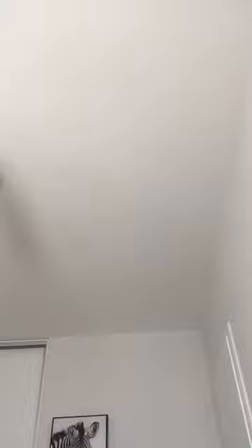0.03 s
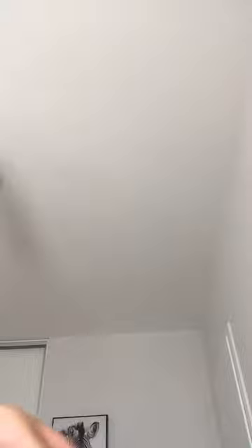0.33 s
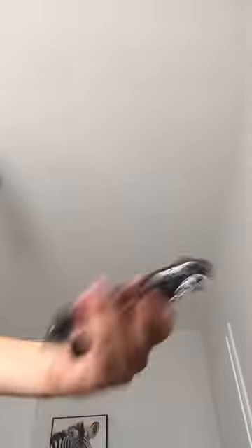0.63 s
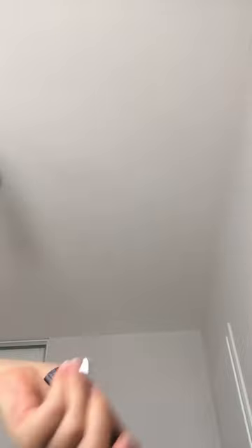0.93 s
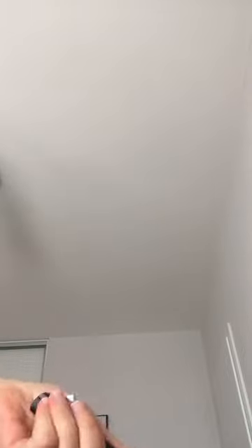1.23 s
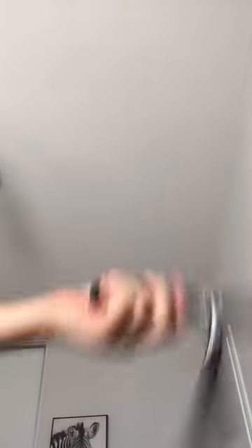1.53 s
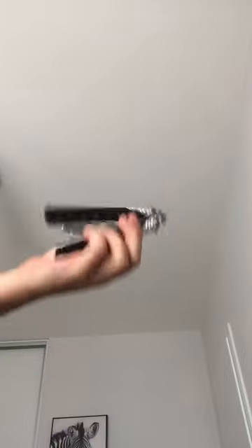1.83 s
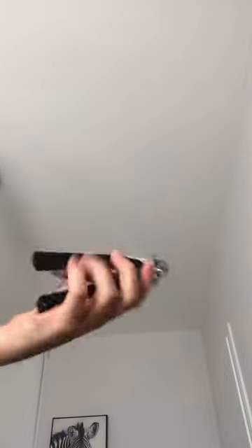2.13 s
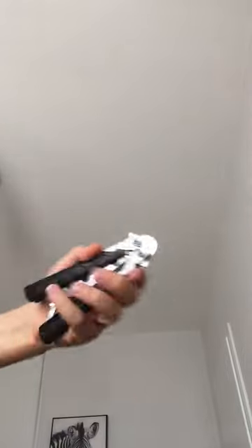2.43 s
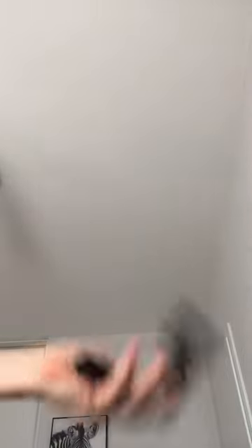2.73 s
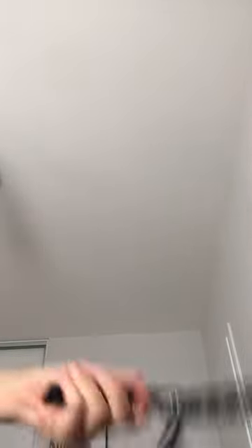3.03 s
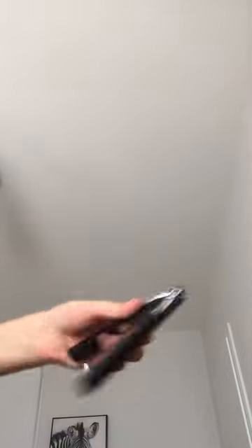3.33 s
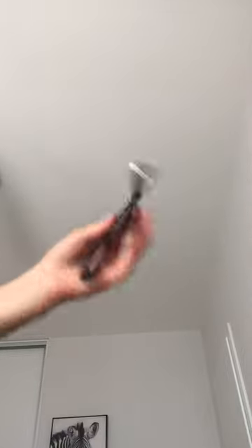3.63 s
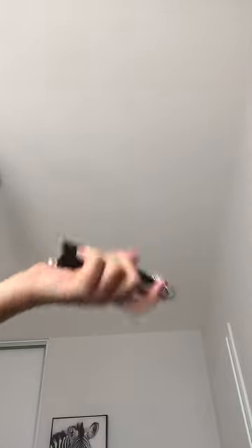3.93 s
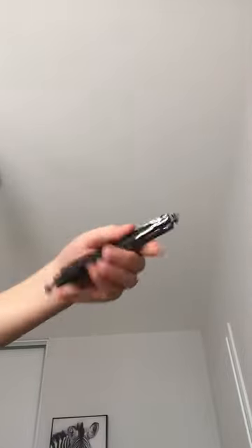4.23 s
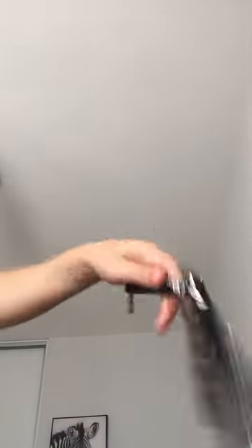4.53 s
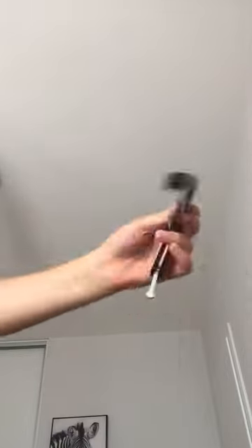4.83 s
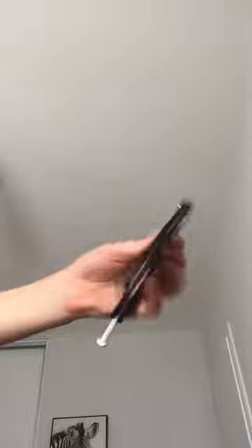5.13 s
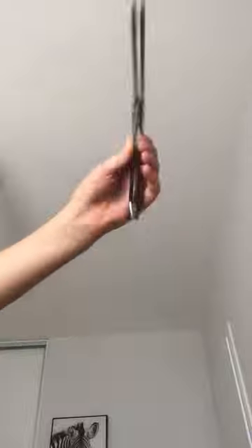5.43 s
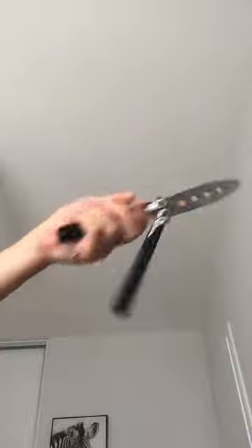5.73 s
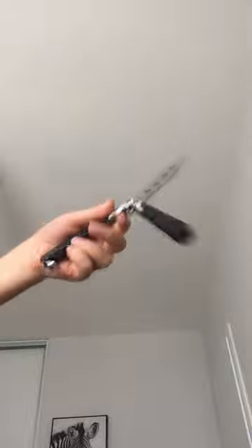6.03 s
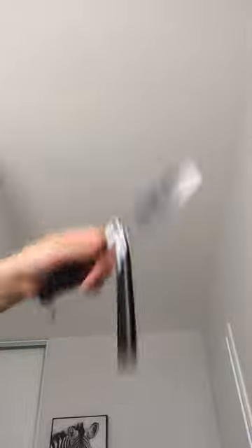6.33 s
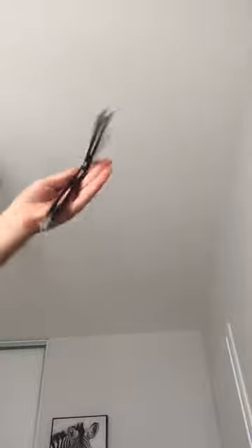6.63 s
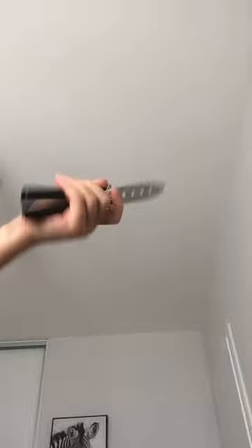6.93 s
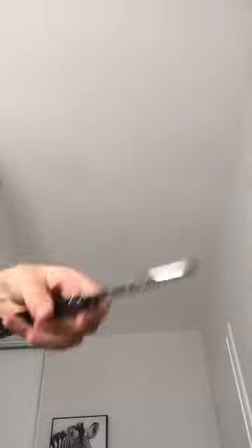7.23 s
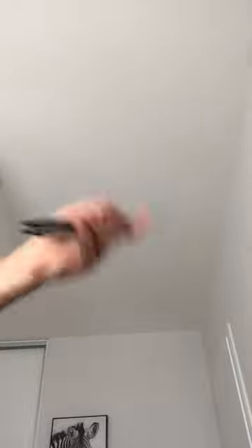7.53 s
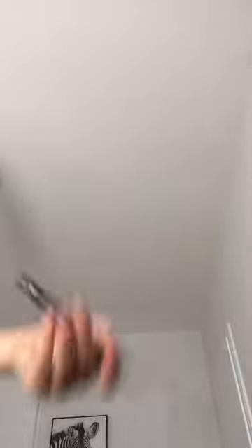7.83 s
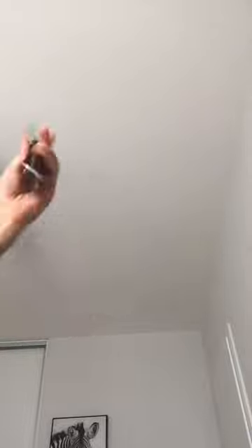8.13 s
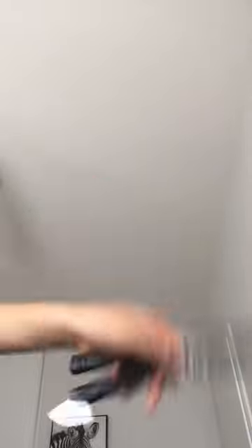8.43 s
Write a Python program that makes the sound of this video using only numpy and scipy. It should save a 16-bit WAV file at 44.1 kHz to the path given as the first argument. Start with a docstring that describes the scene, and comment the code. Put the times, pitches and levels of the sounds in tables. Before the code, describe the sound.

A butterfly knife is flipped by hand close to the microphone, in a small room with a faint steady hum. Light ticks begin at about 0.5 seconds and lead straight into a quick run of bright metal clacks as handles and blade meet. The two loudest hits, each with a brief scrape, land at about 1.2 and 1.9 seconds. Dense, uneven clusters follow from 2.2 to 4.4 seconds, with loose pivots rattling, the latch ticking and a handle sometimes slapping softly into the palm. The clicking then turns lighter, with sharper clacks near 5.7, 6.2, 6.8 and 7.6 seconds. A last flurry runs from about 8.2 to 8.6 seconds. Every hit is short and crisp, with little ringing because the hand damps the steel, and the bare walls add a slight, short echo.

```python
"""A small quiet room, close up: a butterfly knife is flipped by hand.
Handles and blade scrape and clack together in quick runs, and the handles slap into the hand.
The latch ticks and the loose pivots rattle in between. The hand damps the steel, so every
blow is short. Bare walls answer over a faint room hum."""
import sys
import numpy as np
from scipy import signal
from scipy.fft import rfft, irfft, next_fast_len
from scipy.io import wavfile

SR = 44100
rng = np.random.default_rng(int(sys.argv[2]) if len(sys.argv) > 2 else 0)


def wrap_up_sound(samples):
    """Save the sound to the file named by the first command line argument, as 16-bit audio."""
    columns = np.atleast_2d(samples).T
    # keep every value between -1 and 1, then stretch to whole-number steps
    tamed = np.clip(columns, -1, 1)
    steps = np.round(tamed * 32767).astype(np.int16)
    wavfile.write(sys.argv[1], SR, steps)


N = 382788

# Room hum spectrum. Each row: frequency in Hz, relative level in dB.
HUM_SPECTRUM = [(15, -25), (25, -6), (80, -1.5), (229, -12.5), (363, -14), (1100, -18.5), (1840, -18),
                (2050, -23.5), (2760, -20.5), (3080, -21), (16000, -38.5)]
# Room hum envelope. Each row: time in seconds, RMS level in dB.
HUM_ENVELOPE = [(0, -64), (0.499, -67), (8.598, -67.5)]
# Lone latch taps between flips. Each row: start in seconds, level in dB.
LATCH_TAPS = [(0.517, -47.5), (0.6631, -43), (1.1546, -41), (2.1797, -38.5), (3.13, -37), (3.712, -44.5),
              (4.146, -46.5), (5.0834, -46), (5.9581, -38.5), (7.1052, -46.5), (8.0737, -43)]
# Modes of blade and handles. Each row: frequency in Hz, relative level in dB, T60 in seconds.
STEEL_MODES = [(2466, -10.5, 0.079), (2950, -13.5, 0.13), (4270, -11.5, 0.0092), (5855, 2, 0.012),
               (6148, -9.5, 0.015), (6486, -6.5, .04), (8400, -14, .03), (9340, -3.5, 0.003),
               (9840, -20.5, .015), (9900, -18.5, 0.018), (11740, -12, 0.008), (13850, 3, 0.0074),
               (14580, -14, 0.0057)]
# A free handle rattles on its pivot and sings. Each row: start in seconds, end in seconds,
# rattle level in dB, singing level in dB, singing pitch in Hz.
HANDLE_SWINGS = [(0.618, 0.897, -70, -78, 6000), (1.193, 1.395, -78, -72, 8440),
                 (1.793, 2.19, -61.5, -65, 5750), (2.552, 3.348, -63, -60, 9810),
                 (3.707, 4.495, -65, -86, 5930), (5.148, 5.745, -73, -60, 6190),
                 (7.078, 7.804, -75, -74.5, 2610), (8.023, 8.4, -65, -73, 3788),
                 (8.394, 8.673, -69, -66.5, 9990)]
# Handles and blade meet. Each row: start in seconds, level in dB, clack and crack in dB
# relative to that level, clack pitch in Hz.
STEEL_CONTACTS = [(0.687, -29.5, -15, -1.5, 2390), (0.6983, -27.5, -9.5, -6, 4850),
                  (0.7464, -29, -16.5, -16, 2350), (0.7859, -18.5, -22.5, -17, 3020),
                  (0.817, -38, -3.5, -17, 4900), (0.828, -32, -9, -14, 4100),
                  (0.9796, -16.5, -18.5, -14, 3080), (1.0159, -15.5, -17, -15.5, 3970),
                  (1.0242, -22, -10, -22.5, 3100), (1.2101, -6, -19.5, -15, 2960),
                  (1.4039, -16.5, -8, -10.5, 3030), (1.4548, -29.5, -8, -14.5, 4250),
                  (1.6626, -44.5, -22, -13, 4400), (1.7912, -31.5, -20, -17.5, 3050),
                  (1.8733, -7.5, -17.5, -9.5, 2220), (1.895, -16.5, -9.5, -9, 4400),
                  (1.947, -14.5, -15, -21, 2970), (2.0562, -30.5, -10.5, -2, 3900),
                  (2.2204, -23, -12.5, -7.5, 3930), (2.3066, -20.5, -8.5, -8, 4450),
                  (2.4368, -39, -11, -23, 2410), (2.5917, -30, -7.5, -10, 4250),
                  (2.6213, -26.5, -14, -7, 4470), (2.6698, -29, -16, -10, 2290),
                  (2.7008, -24.5, -11.5, -11, 2300), (2.7865, -36, -8.5, -12, 2330),
                  (2.8124, -20, -17.5, -7.5, 3060), (2.8966, -34.5, -6.5, -15, 3200),
                  (2.9112, -26.5, -16, -19, 2240), (2.9974, -34.5, -1.5, -11, 4530),
                  (3.0053, -17, -18, -15, 3010), (3.1896, -45, -6.5, -10, 3050),
                  (3.2884, -32, -11, -20, 2290), (3.3159, -36, -4, -12, 2700), (3.3625, -20, -4, -7, 4300),
                  (3.3906, -17, -20, -8.5, 2980), (3.5034, -27.5, -19.5, -29, 2330),
                  (3.7737, -33.5, -14, -25, 2330), (3.8101, -24, -10, -6, 3880),
                  (3.8761, -18, -13, -19, 3180), (3.9549, -32.5, -9.5, -14.5, 3150),
                  (4.1787, -34, -7, -12, 2550), (4.2067, -38.5, -9, -7, 4770),
                  (4.2472, -30.5, -4, -2, 4570), (4.2582, -23, -12, -12, 2980),
                  (4.2929, -34, -3.5, -8, 2480), (4.3717, -32.5, -13, -5, 4640),
                  (4.5531, -24, -26, -9, 3030), (4.6818, -39, -22.5, -27.5, 2320),
                  (4.8367, -27.5, -10, -15, 3960), (4.8828, -38, -2.5, -11, 2240),
                  (4.998, -38.5, -10, -13.5, 2280), (5.1801, -39, -7, -22, 4300),
                  (5.2426, -36, -4.5, -20, 2800), (5.2596, -32, -8, -37, 3800),
                  (5.3255, -37.5, -13, -2, 3240), (5.3667, -40.5, -16, -10, 2230),
                  (5.533, -35, -15.5, -16, 2220), (5.6016, -30.5, -20, -11, 4230),
                  (5.6758, -34, -2.5, -15, 2100), (5.7262, -15.5, -14.5, -16, 4480),
                  (5.7371, -20.5, -13, -18, 3170), (5.883, -40, -11.5, -16, 2800),
                  (6.0366, -28.5, -6.5, -15, 2370), (6.1173, -32.5, -21, -17, 3980),
                  (6.2123, -24.5, -1, -11.5, 3910), (6.3038, -38.5, -14.5, -26, 2700),
                  (6.4114, -33.5, -13, -13, 3600), (6.5252, -38.5, -13.5, -19, 3310),
                  (6.6884, -41.5, -16, -18, 2270), (6.8021, -18.5, -9.5, -11.5, 3850),
                  (7.1521, -53.5, 7.5, -15, 2700), (7.236, -30, -2.5, -8, 4050),
                  (7.2735, -29.5, -9, -9.5, 3960), (7.4796, -26.5, -3.5, -10, 4100),
                  (7.5692, -34, -15.5, -20, 3900), (7.6327, -21, -16.5, -21, 2610),
                  (7.8444, -32.5, -5.5, -8, 4110), (8.229, -37.5, -8, -4, 4940),
                  (8.3057, -31.5, -15, -7, 3830), (8.3447, -42.5, -11, 9, 3680),
                  (8.4267, -32.5, -10.5, -17, 2460), (8.519, -29, -9, -11, 3570),
                  (8.5539, -22, -14.5, -13.5, 3270), (8.6447, -29, -28, -7, 4540)]
# A handle lands in the hand. Each row: start in seconds, level in dB before the slap gain.
HAND_CATCHES = [(1.014, -40), (1.208, -38.5), (1.402, -41.5), (1.87, -29.5), (2.217, -36.5), (2.303, -36),
                (2.699, -41.5), (3.003, -33.5), (3.313, -38), (3.359, -30), (6.213, -39.5), (8.515, -45)]
# The closing blade scrapes a handle. Each row: start in seconds, length in seconds, level in dB.
BLADE_SCRAPES = [(1.193, 0.025, -13), (1.881, 0.012, -23), (3.342, .018, -42), (3.852, 0.017, -27.5),
                 (4.811, .024, -31.5), (6, 0.024, -43), (6.786, .015, -33.5), (7.217, 0.016, -34),
                 (7.829, 0.0077, -36.5)]

CLACK_HZ, STEEL_HZ, CRACK_HZ, TOP_HZ = 2100, 4900, 10500, 16000  # band edges
BLOW_TIME_S = np.arange(SR // 12) / SR
BLOW_GAIN = np.sqrt(0.002 * SR)  # unit energy to unit RMS over 2 ms


def amp(db):
    return 10 ** (np.asarray(db) / 20)


def unit_energy(x):
    return x / np.sqrt(np.sum(x ** 2) + 1e-20)


def filtered(x, gain_at_hz):
    """Zero-phase filter."""
    size = next_fast_len(N + 8192)
    return irfft(rfft(x, size) * gain_at_hz(np.fft.rfftfreq(size, 1 / SR)), size)[:N]


def band(x, low_hz, high_hz, order):
    """Causal band-pass, unit energy."""
    return unit_energy(signal.lfilter(*signal.butter(order, [low_hz, high_hz], 'bandpass', fs=SR), x))


def add(track, start_s, sound):
    part = track[max(round(start_s * SR), 0):][:len(sound)]
    part += sound[:len(part)]


def room_hum():
    """Steady low rush of shaped noise."""
    points_hz, points_db = np.transpose(HUM_SPECTRUM)
    noise = filtered(rng.standard_normal(N),
                     lambda hz: amp(np.interp(np.log(hz + 1), np.log(points_hz + 1), points_db)))
    level_db = np.interp(np.arange(N) / SR, *np.transpose(HUM_ENVELOPE))
    return amp(level_db) * noise / np.std(noise)


def grit(spikiness):
    """Spiky contact force: noise with log-normal weights."""
    size = len(BLOW_TIME_S)
    return rng.standard_normal(size) * np.exp(spikiness * rng.standard_normal(size))


def chatter(t60_s, rise_s=0.0001):
    """Faces bounce many times as they meet; the force dies in milliseconds."""
    attack = 1 - np.exp(-BLOW_TIME_S / rise_s)
    return unit_energy(grit(spikiness=1.0) * amp(-60 * BLOW_TIME_S / t60_s) * attack)


def ringing(force, modes, scatter_db=4, detune=0.02):
    """Damped modes driven by a force; grip and contact point shift their pitch and strength."""
    hz, db, t60_s = np.transpose(modes)[:, :, None]
    hz = hz * (1 + detune * rng.standard_normal(hz.shape))
    gain = amp(db + scatter_db * rng.standard_normal(hz.shape)) / np.sqrt(t60_s)
    partials = gain * amp(-60 * BLOW_TIME_S / t60_s) * np.cos(2 * np.pi * hz * BLOW_TIME_S)
    return unit_energy(signal.fftconvolve(force, partials.sum(axis=0))[:len(force)])


def blow(force, crack_t60_s, level_db, clack_db, crack_db, clack_hz, steel_db=-8):
    """A force on the knife: dull knock in the hand, handle clack, steel ring, bright crack."""
    metal = force + ringing(force, STEEL_MODES)
    handle = metal + amp(-3) * ringing(force, [(clack_hz, 0, 0.008)])  # the grip sets this pitch
    knock = band(force, 950, 1900, order=2) - amp(-11) * band(force, 130, 950, order=2)
    knock_db = -22 + 0.53 * clack_db
    crack = metal * amp(-60 * np.arange(len(force)) / SR / crack_t60_s)  # the top band dies first
    sound = (amp(knock_db) * knock
             + amp(clack_db) * band(handle, CLACK_HZ, STEEL_HZ, order=4)
             + amp(steel_db) * band(metal, STEEL_HZ, CRACK_HZ, order=4)
             + amp(crack_db) * band(crack, CRACK_HZ, TOP_HZ, order=4))
    return amp(level_db) * BLOW_GAIN * sound


def room_echoes(t60_s=0.38, rise_s=0.0013):
    """Diffuse impulse response, drawn anew each time as the knife moves about."""
    t = np.arange(SR // 3) / SR
    return unit_energy(rng.standard_normal(len(t)) * amp(-60 * t / t60_s) * (1 - np.exp(-t / rise_s)))


def with_room(track, wet_db):
    return track + amp(wet_db) * signal.fftconvolve(track, room_echoes())[:N]


def latch_ticks(faint_db=-46, scatter_s=0.031, ticks_per_s=16, over_rattle_db=14, crack_t60_s=0.017):
    """The loose latch taps between flips, around each contact and at random during swings."""
    track = np.zeros(N)
    ticks = list(LATCH_TAPS)
    ticks += [(start_s + scatter_s * rng.standard_normal(), faint_db) for start_s, *_ in STEEL_CONTACTS]
    for start_s, end_s, rattle_db, *_ in HANDLE_SWINGS:
        times_s = start_s + np.cumsum(rng.exponential(1 / ticks_per_s, size=16))
        ticks += [(time_s, rattle_db + over_rattle_db) for time_s in times_s[times_s < end_s]]
    for start_s, level_db in ticks:
        tick = blow(chatter(t60_s=0.019), crack_t60_s, level_db + rng.standard_normal(), clack_db=-10,
                    crack_db=-21.5, clack_hz=rng.uniform(CLACK_HZ, STEEL_HZ), steel_db=-11.5)
        add(track, start_s, tick)
    return with_room(track, wet_db=-9)


def pivot_rattle(shake_t60_s=0.33, slip_db=8, sing_t60_s=0.035, bend_hz=2340, bend_db=-9):
    """Contacts shake the loose pivots; the rattle rings the steel and the free handle, then settles."""
    track, jolts = np.zeros(N), np.zeros(N)
    jolts[[round(start_s * SR) for start_s, *_ in STEEL_CONTACTS]] = 1
    shake = signal.lfilter([1], [1, -amp(-60 / (shake_t60_s * SR))], jolts)
    stick_slip = amp(slip_db * np.repeat(rng.standard_normal(N // 128 + 1), 128)[:N])  # 3 ms steps
    friction = rng.standard_normal(N) * shake * stick_slip
    for start_s, end_s, rattle_db, sing_db, sing_hz in HANDLE_SWINGS:
        force = unit_energy(friction[round(start_s * SR):round(end_s * SR)])
        rattle = band(force + ringing(force, STEEL_MODES), CLACK_HZ, CRACK_HZ, order=2)
        singing = ringing(force, [(sing_hz, 0, sing_t60_s)])
        singing += amp(bend_db) * ringing(force, [(bend_hz, 0, sing_t60_s)])
        envelope = np.sqrt(len(force)) * signal.windows.tukey(len(force), 0.1)
        add(track, start_s, envelope * (amp(rattle_db) * rattle + amp(sing_db) * singing))
    return with_room(track, wet_db=-9)


def steel_clacks(graze_db=-22, wall_db=-22, wet_db=-11, crack_t60_s=0.03, air_t60_s=1.3):
    """Handles and blade collide: a square blow cracks briefly, a glancing one chatters on."""
    track = np.zeros(N)
    for start_s, level_db, clack_db, crack_db, clack_hz in STEEL_CONTACTS:
        voicing = level_db, clack_db, crack_db, clack_hz
        chatter_t60_s = 0.008 * 2 ** (-crack_db / 15)  # doubles per 15 dB less crack
        hit = blow(chatter(chatter_t60_s), crack_t60_s, *voicing)
        add(track, start_s - 0.22 * chatter_t60_s, amp(graze_db) * hit)  # the faces graze first
        add(track, start_s, hit)
        for delay_s in rng.uniform(0.0061, 0.05, size=3):  # ceiling and nearest walls
            add(track, start_s + delay_s, amp(wall_db) * hit)
        add(track, start_s, amp(wet_db) * blow(room_echoes(), air_t60_s, *voicing))
    return track


def hand_slaps(slap_gain_db=-5, band_hz=(556, 1400), wet_db=-8):
    """Flesh yields and stops the handle softly: a short, dull slap that the room repeats."""
    track = np.zeros(N)
    for start_s, level_db in HAND_CATCHES:
        gain = amp(level_db + slap_gain_db) * BLOW_GAIN
        add(track, start_s, gain * band(chatter(t60_s=0.007, rise_s=0.003), *band_hz, order=1))
        add(track, start_s, gain * amp(wet_db) * band(room_echoes(), *band_hz, order=1))
    return track


def blade_scrapes(crack_t60_s=0.2):
    """Steel slides on steel: a brief, gritty force."""
    track = np.zeros(N)
    for start_s, length_s, level_db in BLADE_SCRAPES:
        force = unit_energy(grit(spikiness=0.6) * (BLOW_TIME_S < length_s))
        scrape = blow(force, crack_t60_s, level_db, clack_db=-14, crack_db=-19, clack_hz=3700)
        add(track, start_s, scrape)
    return with_room(track, wet_db=-11)


def scene():
    """Knife, hand and room in mono."""
    mix = steel_clacks() + blade_scrapes() + hand_slaps() + pivot_rattle() + latch_ticks() + room_hum()
    return mix[None]


def record(dry):
    """Clip at full scale, mute the first 61 ms, low-pass steeply."""
    gated = np.clip(dry[0], -1, 1) * (np.arange(N) / SR > 0.061)
    return filtered(gated, lambda hz: 1 / np.sqrt(1 + (hz / TOP_HZ) ** 120))[None]


dry = scene()
out = record(dry)
wrap_up_sound(out)
```